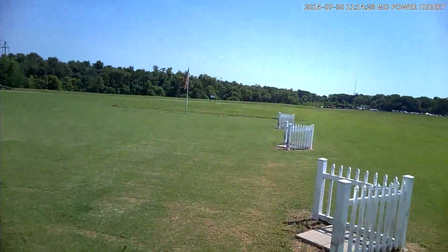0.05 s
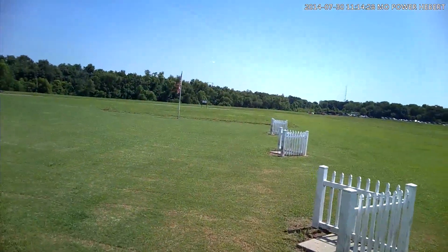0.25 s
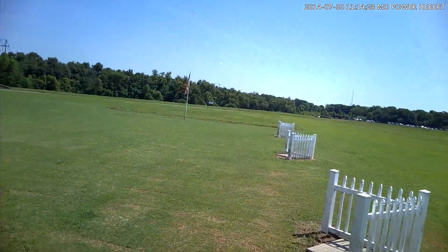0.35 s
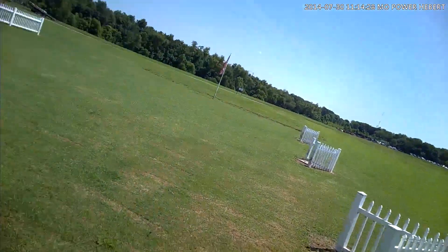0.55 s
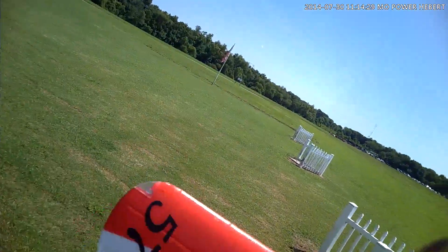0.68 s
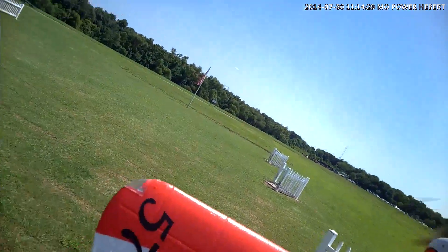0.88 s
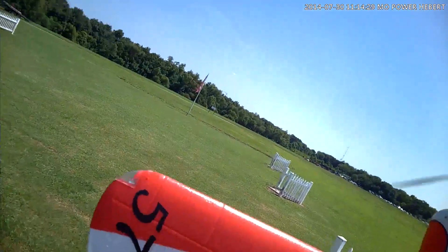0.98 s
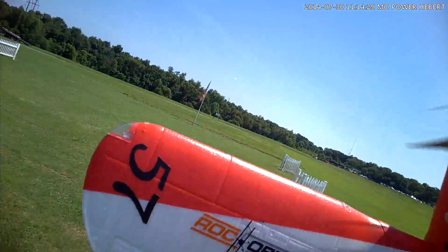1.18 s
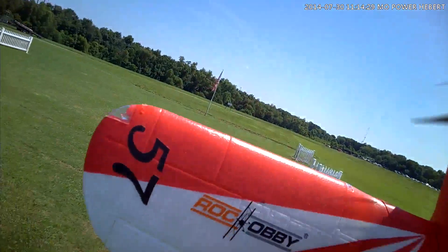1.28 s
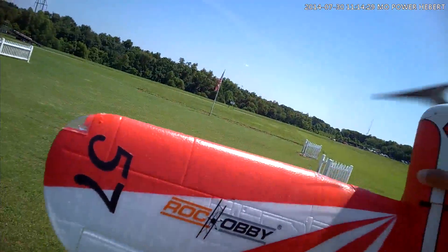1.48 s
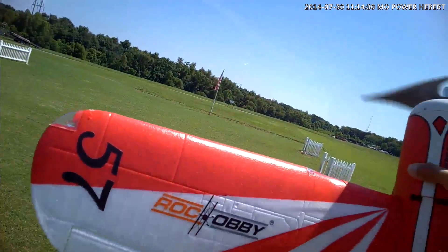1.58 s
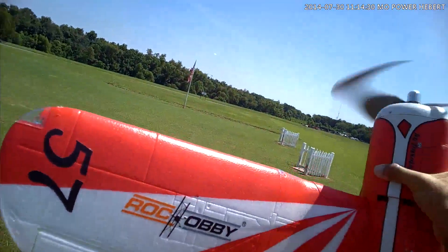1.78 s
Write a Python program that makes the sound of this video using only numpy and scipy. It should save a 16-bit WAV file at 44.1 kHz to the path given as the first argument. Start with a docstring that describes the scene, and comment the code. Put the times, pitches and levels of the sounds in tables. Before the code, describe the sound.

A model plane's small electric propeller spins up with a thin motor whine and light airframe buzz, holds a loud hissing drone, then drops quickly in pitch and fades, close to a small microphone outdoors.

```python
"""Model plane propeller run

A hand-held model plane's electric motor spins its two-blade propeller up, holds it and lets it wind down.
The blades sound a harmonic tone at their passing rate and chop turbulent hiss once a pass.
The motor whines on high orders, its controller whistles, the airframe buzzes at the start.
A faint open-air background lies beneath; a small microphone close by bends the wave."""
import sys
import numpy as np
from scipy import signal
from scipy.fft import rfft, irfft
from scipy.io import wavfile
from scipy.ndimage import uniform_filter1d

SR = 44100
rng = np.random.default_rng(int(sys.argv[2]) if len(sys.argv) > 2 else 0)


def gain_from_db(level_db):
    """Turn a decibel level (scalar or array-like) into a linear amplitude factor."""
    decades = np.asarray(level_db, float) / 20
    return 10 ** decades


def master_out(mix):
    """Clip the mix to full scale and print it as 16-bit PCM to the path in sys.argv[1]."""
    frames = np.transpose(np.atleast_2d(mix))
    ceiling = np.clip(frames, -1, 1)
    pcm = np.round(ceiling * 32767).astype(np.int16)
    wavfile.write(sys.argv[1], SR, pcm)


N = 81585

# Run-up, hold and coasting of the propeller. Each row: time in seconds, blade passes in Hz.
BLADE_RATE = [(0, 63), (.067, 74), (.082, 84), (.1, 92.5), (.15, 116), (.19, 129), (.225, 149.5),
              (.275, 173), (.31, 183), (.345, 186), (.44, 232), (.5, 252), (.55, 279), (.59, 289),
              (.63, 292.6), (.9, 292.8), (1.33, 290.6), (1.37, 286.5), (1.43, 267), (1.5, 213), (1.64, 137),
              (1.74, 102), (1.85, 77)]
# Turbulence of the loaded blades. Each row: time in seconds, hiss level in dB, added treble in dB.
BLADE_LOAD = [(0, -52.5, -7), (.1, -49.5, -1.5), (.18, -44, -8), (.21, -40, -5), (.3, -37, -1.5),
              (.42, -34, 1), (.52, -35, 3.5), (.7, -32, 3.5), (1, -30.5, 3), (1.3, -29, 4),
              (1.44, -30.5, 0.5), (1.56, -33.5, -4), (1.68, -42, -8.5), (1.85, -57, -0.5)]
# Harmonics of the blade tone. Each row: multiple of the blade rate, level at REFERENCE_HZ in dB rms,
# slope in dB per octave of speed, phase in radians, random wobble in dB.
BLADE_HARMONICS = [(.5, -56.5, 36, 2.5, 6.5), (1, -23, 30.5, 0.5, 0), (2, -35, 32, 4, 1.5),
                   (3, -54, 43, -2.5, 4), (4, -49.5, 32, 1.05, 2)]
# Relative spectrum of the hiss. Each row: frequency in Hz, density in dB per Hz.
HISS_SPECTRUM = [(30, -25), (150, -15.5), (430, -6), (670, -3.5), (1050, 0), (1450, -3), (1900, 1.5),
                 (2300, -5), (2800, -17), (3800, -7.5), (4400, -12.5), (4750, -22), (5100, -9), (5600, -20),
                 (6000, -27.5), (6400, -16), (8000, -24), (9200, -12.5), (10100, -26.5), (11000, -18.5),
                 (12500, -30), (16000, -34)]
# Modulation of the hiss by each blade pass. Each row: frequency in Hz, depth in dB, lag in radians.
PASS_CHOP = [(300, -0.5, -1.3), (1040, 1.5, -0.78), (1960, 1.5, -0.73), (3350, 5, 1.8), (5170, 0.5, 1.2),
             (8850, 5.5, 1.2), (12000, -0.5, -0.17)]
# Passing motor whines. Each row: centre in seconds, half width in seconds,
# order as a multiple of the blade rate, level in dB rms.
PASSING_ORDERS = [(.055, .013, 21, -38.5), (.078, .007, 21, -45), (.097, .009, 21, -49),
                  (.142, .029, 21, -40), (.328, .018, 21, -42), (.246, .028, 21, -37),
                  (.22, .015, 10.5, -38), (.255, .022, 10.5, -46), (.425, .013, 4.5, -37),
                  (.078, .007, 42, -44), (.538, .016, 14, -34), (.537, .014, 16, -37),
                  (1.415, .015, 14, -33), (1.415, .014, 16, -41), (1.8, .075, 21, -55.5),
                  (1.765, .06, 7, -52)]
# Orders that sing at full speed. Each row: order as a multiple of the blade rate, level at REFERENCE_HZ
# and FULL_HISS_DB in dB rms, slope in dB per octave of speed, random wobble in dB.
STEADY_ORDERS = [(14, -40, 28, 1.5), (21, -59, 40, 2)]
# Airframe resonances. Each row: frequency in Hz, width in Hz, relative gain in dB.
AIRFRAME_MODES = [(3960, 70, 20), (3400, 250, 11), (840, 87, 13)]
# Bursts of airframe buzz. Each row: centre in seconds, half width in seconds, level in dB rms.
BUZZ_BURSTS = [(.045, .025, -51), (.08, .01, -49), (.125, .04, -44.5), (.21, .032, -41), (.27, .025, -45),
               (.325, .022, -47)]
# Relative spectrum of the open air. Each row: frequency in Hz, density in dB per Hz.
FIELD_SPECTRUM = [(30, -6), (250, -11.5), (500, 1), (1100, -10), (2000, -35), (2600, -13), (5800, -17.5),
                  (8000, -21.5), (16000, -22)]
# Switching whistle and sidebands. Each row: added order as a multiple of the blade rate, level in dB rms,
# centre in seconds, half width in seconds.
SWITCHING_LINES = [(0, -59.5, .14, .3), (0, -58, 1.53, .085), (7, -63, .12, .2), (10.5, -61, .225, .035),
                   (21, -67, .04, .06), (-21, -48.5, .275, .022)]

REFERENCE_HZ = 297.1  # blade rate to which levels that follow speed refer
THROTTLE_CUT_S = 1.433  # the drive stops, the propeller coasts
PASS_SCATTER_DB, FLICKER_DB, SHAFT_DB = 1, 0.72, 0.55
FIELD_DB = -53
SWITCH_HZ = 7785
NEAR_SHARE, FULL_HISS_DB = .9, -30  # the steady orders swell with the hiss: dB per dB, reference in dB
WHINE_FLUTTER_DB, WHINE_FLUTTER_RAD = 2.5, .5


def col(table, k, t):
    """Linear interpolation of column k of a table over time."""
    a = np.array(table, float)
    return np.interp(t, a[:, 0], a[:, k])


def unit(x):
    """Normalization to an rms of 1."""
    return x / np.sqrt(np.mean(x ** 2))


def walk(rate):
    """Slow random modulation of rms 1: levels held for 1 / rate seconds, smoothed twice."""
    k = int(SR / rate)
    held = np.repeat(rng.standard_normal(N // k + 1), k)
    return unit(uniform_filter1d(uniform_filter1d(held, k), k)[:N])


def colour(points):
    """Spectral shaping: frequencies and gains, interpolated in dB over log frequency."""
    f, a = np.arange(N // 2 + 1) * SR / N + 1, np.array(points, float)
    return f, gain_from_db(np.interp(np.log(f), np.log(a[:, 0]), a[:, 1]))


def bump(t, centre, half):
    """Swell envelope with a broad top and quick edges, down to 1/e at the half width."""
    return np.exp(-np.abs((t - centre) / half) ** 3)


def field():
    """Broadband ambience: shaped Gaussian noise with a slowly wandering level."""
    gain = colour(FIELD_SPECTRUM)[1]
    noise = irfft(rfft(rng.standard_normal(N)) * gain, N)
    return unit(noise) * gain_from_db(FIELD_DB + walk(7.5))


def hiss(t, phase):
    """Amplitude-modulated turbulence: bands of noise swell at each blade pass, every pass differently."""
    f, gain = colour(HISS_SPECTRUM)
    chop = np.array(PASS_CHOP, float)
    chop_phase = phase + np.pi  # the lags count from half a pass off the blade tone
    passes = chop_phase / (2 * np.pi) + .5
    scatter = np.interp(passes, np.arange(600) + .5, rng.standard_normal(600))
    centres = np.log(40 * 2 ** np.arange(0, 9, .5))  # half-octave bands, log Hz
    # The level refers to the band from 700 to 2500 Hz.
    norm = np.sqrt(np.mean(gain[(f > 700) & (f < 2500)] ** 2) * 1800 / (SR / 2))
    treble_db = col(BLADE_LOAD, 2, t)
    out = 0
    for k, c in enumerate(centres):
        share = np.interp(np.log(f), centres, np.arange(len(centres)) == k)  # of the power
        band = irfft(rfft(rng.standard_normal(N)) * gain * np.sqrt(share), N) / norm
        depth = np.interp(c, np.log(chop[:, 0]), chop[:, 1])
        lag = np.interp(c, np.log(chop[:, 0]), chop[:, 2])
        high = np.clip((c - np.log(900)) / np.log(6), 0, 1)  # treble share: 0 at 900 Hz, 1 at 5400 Hz
        db = depth * np.cos(chop_phase - lag)
        db = db + SHAFT_DB * np.cos(chop_phase / 2)  # once a turn
        db = db + PASS_SCATTER_DB * scatter * min(depth / 3, 1)
        db = db + FLICKER_DB * walk(19.72)
        out = out + band * gain_from_db(db + high * treble_db)
    return out * gain_from_db(col(BLADE_LOAD, 1, t))


def blades(phase, octs):
    """Harmonic radiation at the blade-passing rate, with the once-a-turn imbalance at half of it."""
    out = 0
    for m, db, slope, start_phase, wobble_db in BLADE_HARMONICS:
        level = gain_from_db(db + slope * octs + wobble_db * walk(24.65))
        out = out + level * np.cos(m * phase + start_phase)
    return np.sqrt(2) * out


def switching_whistle(t, phase):
    """Carrier and sidebands: the controller's fixed switching tone, shifted by multiples of the blade rate."""
    carrier = 2 * np.pi * SWITCH_HZ * t
    out = 0
    for m, db, centre, half in SWITCHING_LINES:
        level = gain_from_db(db + 0.84 * walk(29.2)) * bump(t, centre, half)
        out = out + level * np.cos(carrier + m * phase)
    return np.sqrt(2) * out


def airframe_buzz(t):
    """Resonant filtering: rattling noise of fluttering level rings the airframe modes in bursts."""
    f = np.arange(N // 2 + 1) * SR / N
    body = sum(gain_from_db(db) / (1 + 2j * (f - hz) / width) for hz, width, db in AIRFRAME_MODES)
    rattle = rng.standard_normal(N) * gain_from_db(1.6 * walk(300))
    bursts = sum(gain_from_db(db) * bump(t, centre, half) for centre, half, db in BUZZ_BURSTS)
    return unit(irfft(rfft(rattle) * body, N)) * bursts


def passing_whine(t, phase):
    """Passing motor whines: an order of the rotation swells briefly at a set time."""
    out = 0
    for centre, half, m, db in PASSING_ORDERS:
        level = gain_from_db(db + WHINE_FLUTTER_DB * walk(120)) * bump(t, centre, half)
        out = out + level * np.cos(m * phase + WHINE_FLUTTER_RAD * walk(150))
    return np.sqrt(2) * out


def steady_whine(t, phase, octs):
    """Forced magnetic orders: tones locked to rotation grow with speed and cease with the drive."""
    near_db = NEAR_SHARE * (col(BLADE_LOAD, 1, t) - FULL_HISS_DB)
    drive = np.clip((THROTTLE_CUT_S - t) / .01, 0, 1)  # 10 ms fade to the cut
    out = 0
    for m, db, slope, wobble_db in STEADY_ORDERS:
        level = gain_from_db(db + near_db + slope * octs + wobble_db * walk(30))
        out = out + level * np.cos(m * phase + 0.1 * walk(40))
    return np.sqrt(2) * drive * out


def scene():
    """Superposition of the sources, those that turn sharing one rotation phase."""
    t = np.arange(N) / SR
    hz = uniform_filter1d(col(BLADE_RATE, 1, t), size=600)
    unsteady_hz = hz * (1 + 0.0006 * walk(30))
    phase = 2 * np.pi * np.cumsum(unsteady_hz) / SR  # one cycle per blade pass
    octs = np.log2(hz / REFERENCE_HZ)
    air = field() + hiss(t, phase) + blades(phase, octs)
    machine = switching_whistle(t, phase) + airframe_buzz(t)
    machine = machine + passing_whine(t, phase) + steady_whine(t, phase, octs)
    return (air + machine)[None]


def roll_off(x):
    """The treble ends steeply here."""
    return signal.sosfilt(signal.butter(12, 15760, fs=SR, output="sos"), x)


def record(dry):
    """Quadratic distortion: the microphone squeezes pressure peaks, stretches suction and drops deep bass."""
    bent = dry - 1.58 * dry ** 2
    high_pass = signal.butter(2, 48, "high", fs=SR, output="sos")
    mix = signal.sosfilt(high_pass, bent)
    return roll_off(mix)


dry = scene()
out = record(dry)
master_out(out)
```